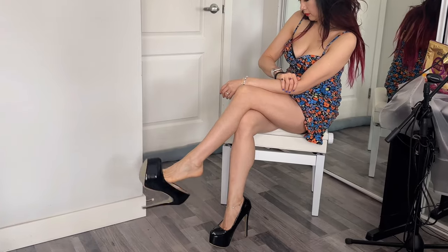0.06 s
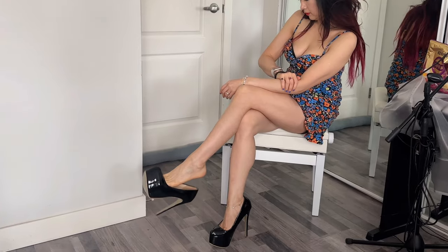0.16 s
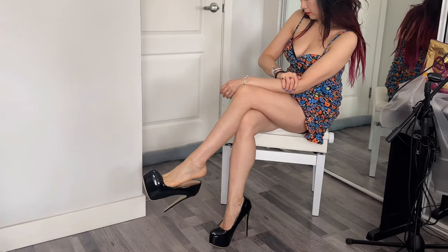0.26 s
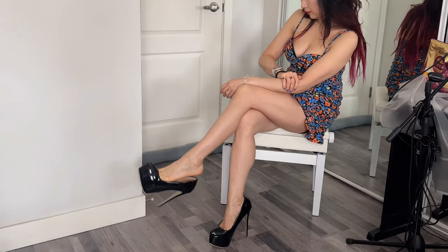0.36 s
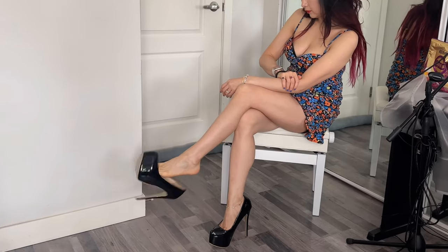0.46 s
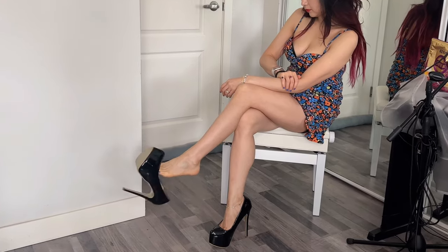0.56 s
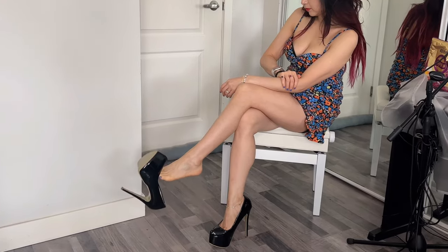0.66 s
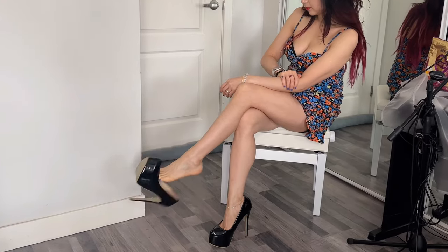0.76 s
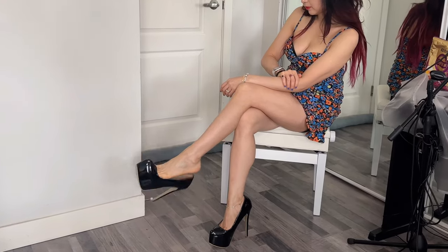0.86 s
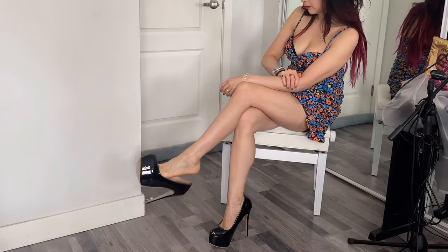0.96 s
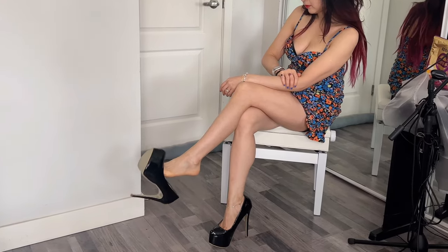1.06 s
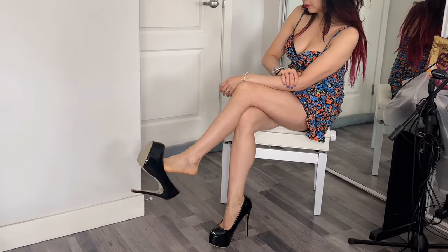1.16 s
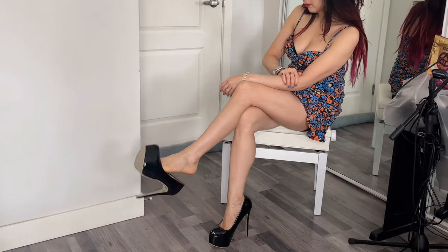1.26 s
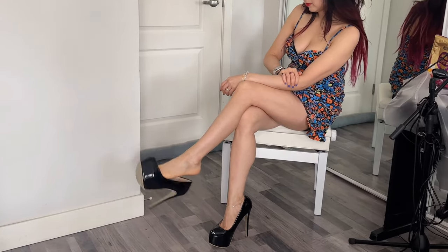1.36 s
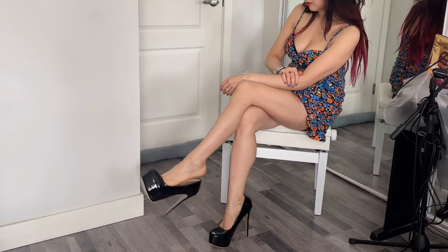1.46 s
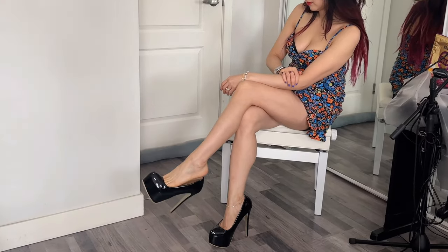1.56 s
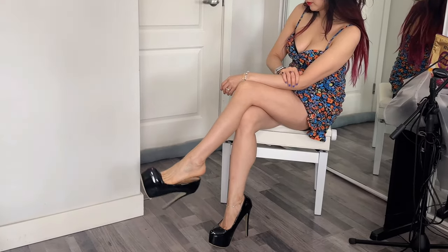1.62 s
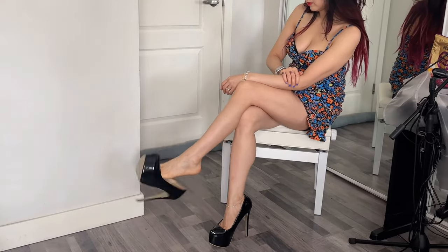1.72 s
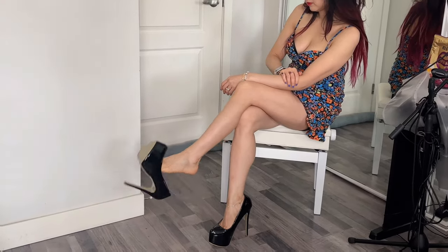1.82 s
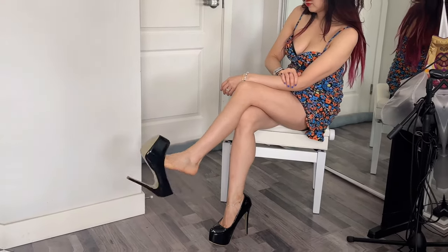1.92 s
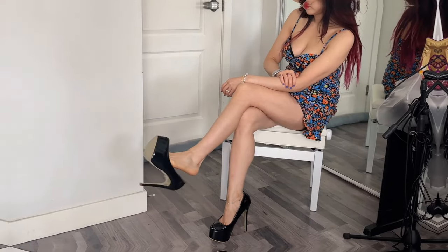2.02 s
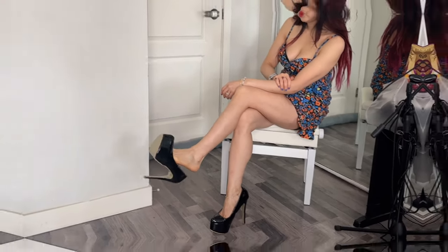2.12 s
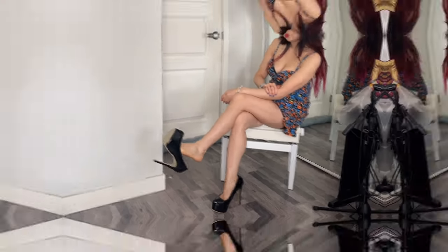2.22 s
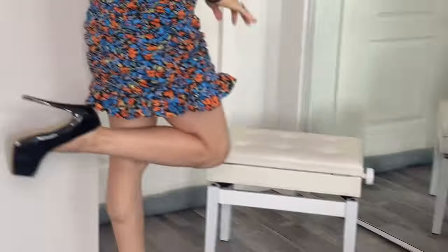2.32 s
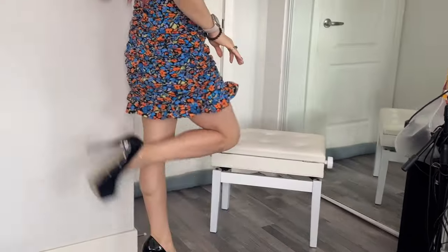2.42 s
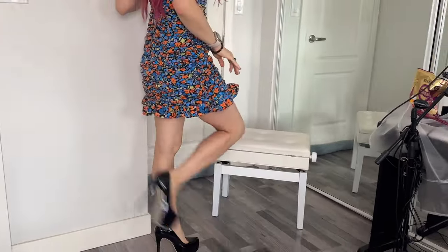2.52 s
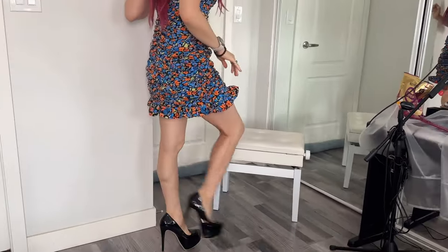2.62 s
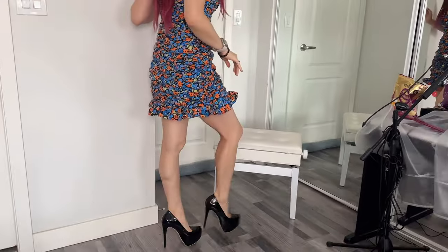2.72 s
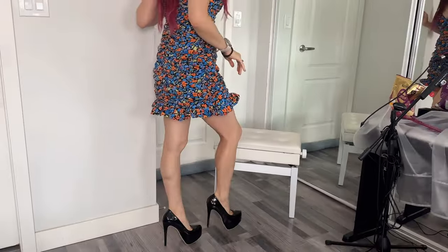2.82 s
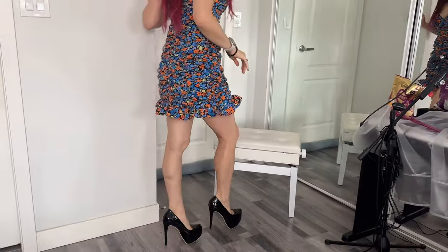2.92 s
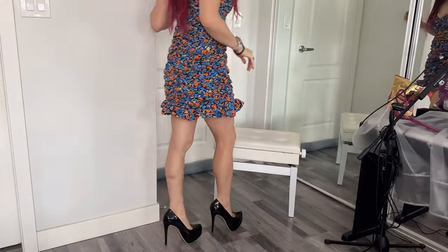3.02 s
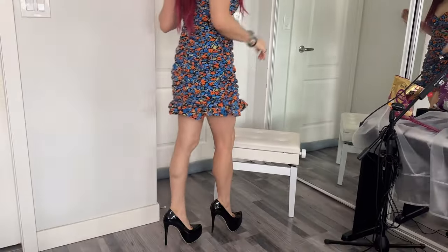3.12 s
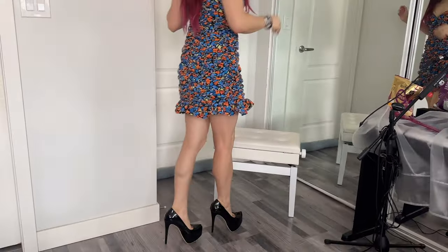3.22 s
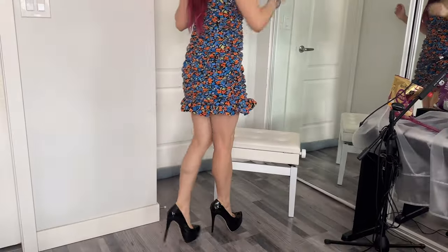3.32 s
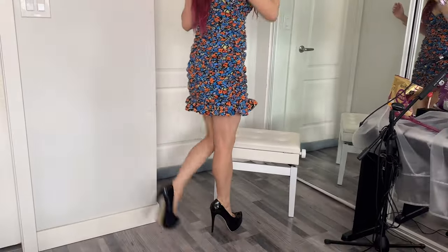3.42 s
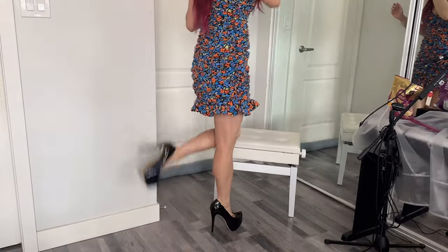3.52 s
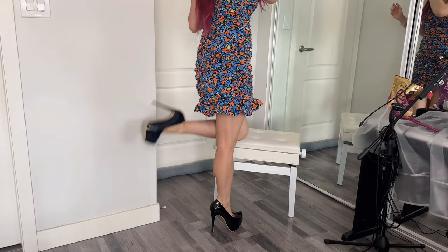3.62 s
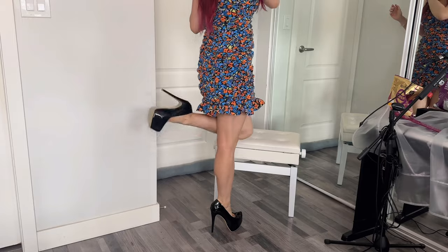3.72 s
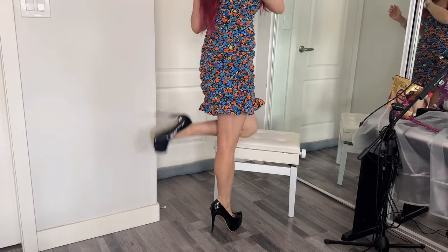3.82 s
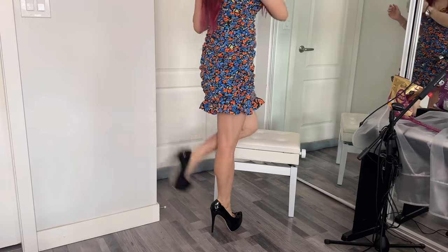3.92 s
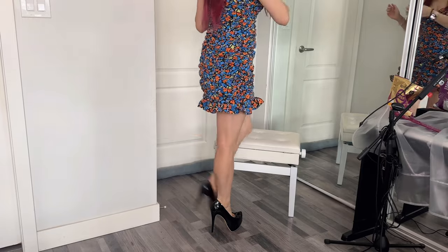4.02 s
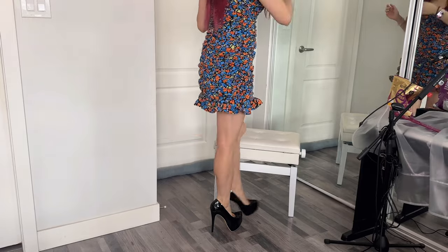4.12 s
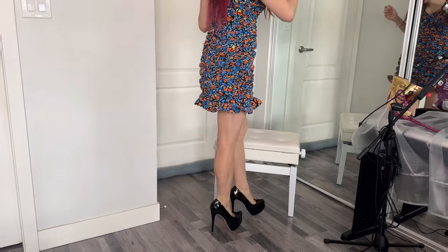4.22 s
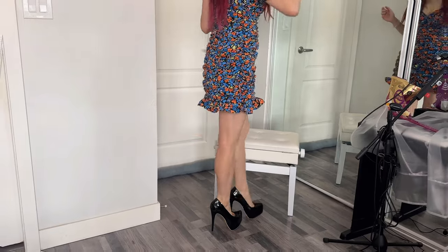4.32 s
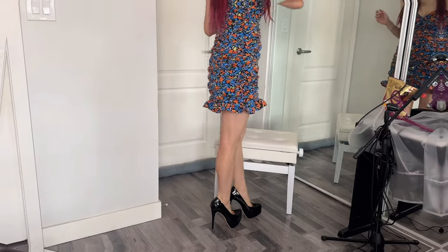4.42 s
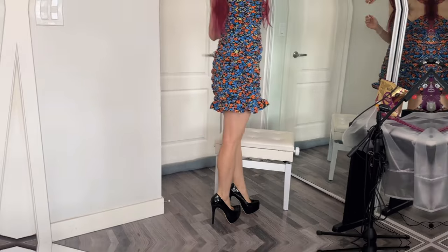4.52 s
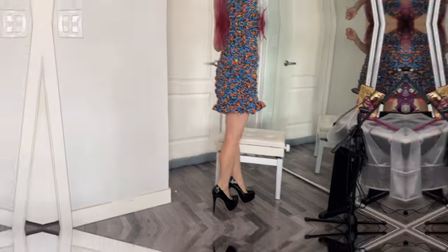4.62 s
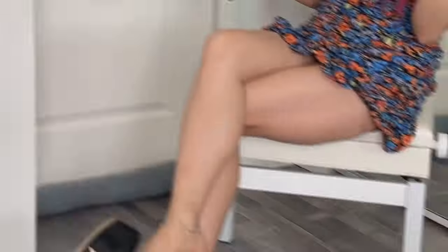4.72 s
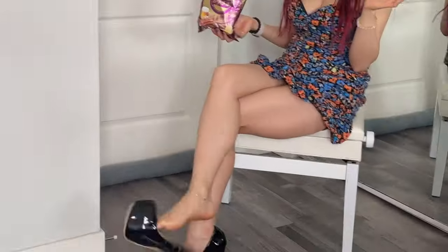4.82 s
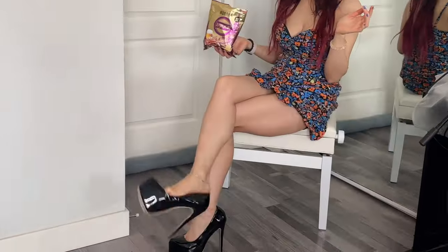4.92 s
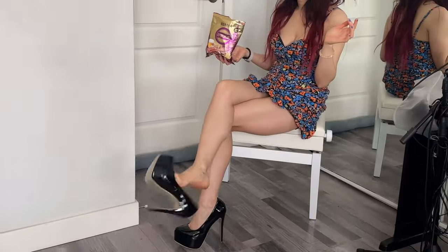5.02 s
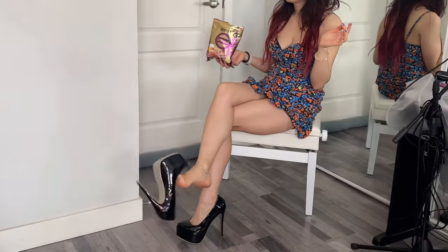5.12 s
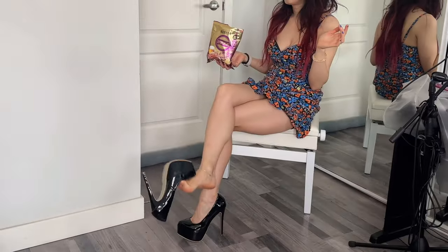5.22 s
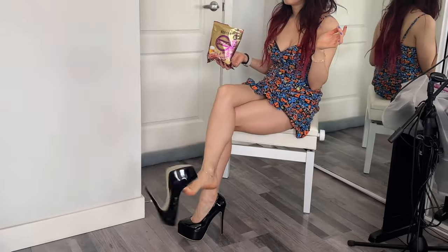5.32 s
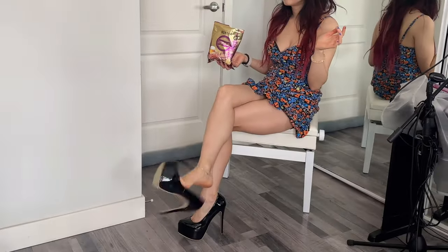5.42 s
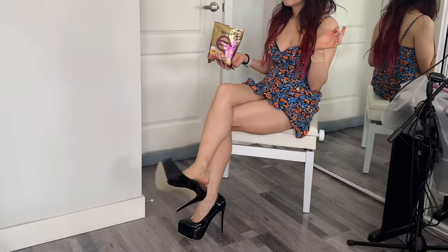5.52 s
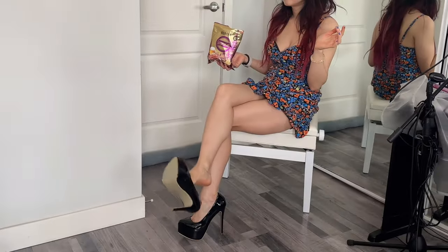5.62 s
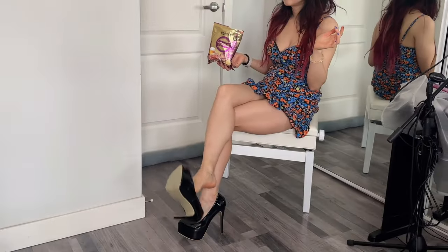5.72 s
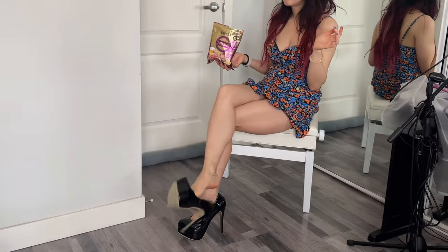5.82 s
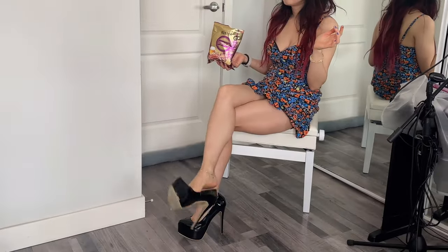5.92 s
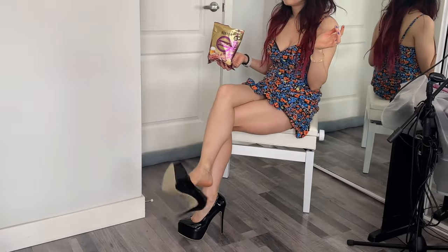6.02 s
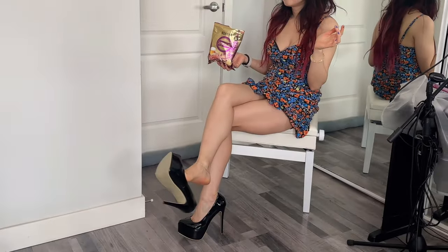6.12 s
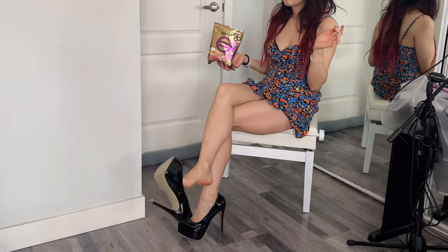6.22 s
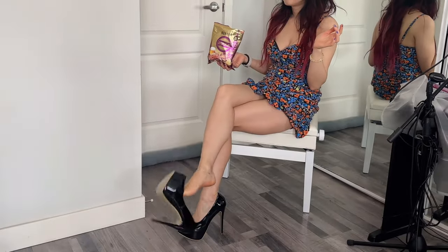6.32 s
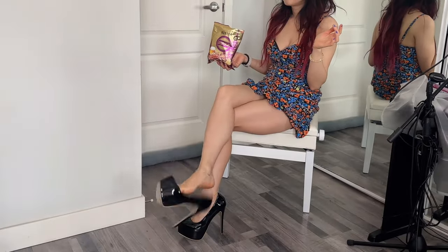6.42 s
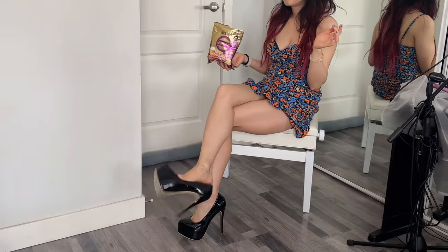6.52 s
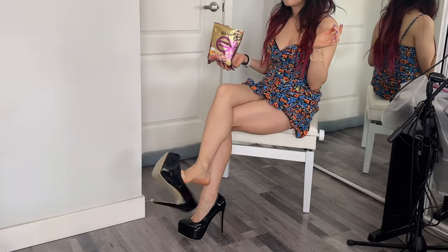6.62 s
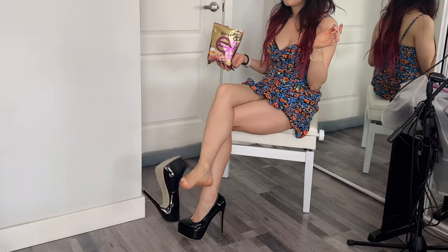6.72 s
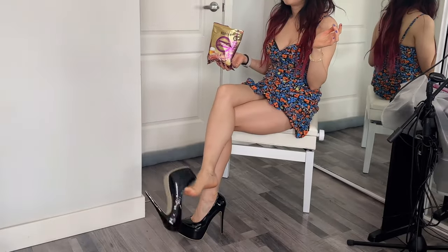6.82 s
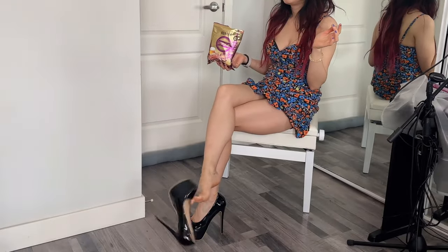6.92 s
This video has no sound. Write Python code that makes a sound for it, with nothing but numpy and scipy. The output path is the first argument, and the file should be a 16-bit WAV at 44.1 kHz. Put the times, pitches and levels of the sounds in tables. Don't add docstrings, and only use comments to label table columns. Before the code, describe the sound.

A small, bare, reflective room with laminate flooring, heard through a stereo microphone a short distance away. Low rumble, soft hiss and a faint wavering fan hum run throughout, with clothing rustle swelling as the body shifts. From 0.3 to 2.3 seconds a stiff high-heeled shoe dangles from the toes, making small hollow knocks, strongest near 0.85, clustered around 1.2, with airy skin slaps at 1.3, 1.55 and 2.1. At 2.65 a sharper slap and tap lead to a heavy double-edged stamp at 3.0, booming in floor and room. Lighter taps follow at 3.3 and 4.1, then a second strong stamp at 4.36 and small contacts. At 4.7 the scene cuts abruptly. A looser shoe swings wide, with duller knocks and soft sole slaps near 4.9, 5.5, 5.9, 6.3, 6.46 and 6.86, over renewed rustle.

```python
import sys
import numpy as np
from scipy import signal
from scipy.fft import rfft, irfft, next_fast_len
from scipy.io import wavfile

SR = 44100
rng = np.random.default_rng(int(sys.argv[2]) if len(sys.argv) > 2 else 0)


def transcribe(u):
    v = np.clip(np.atleast_2d(u).T, -1, 1)
    q = np.round(v * 32767).astype(np.int16)
    wavfile.write(sys.argv[1], SR, q)


def boost_factor(decibels):
    exponent = np.asarray(decibels, float) / 20
    return 10 ** exponent


N = 306936


def rms_one(x):
    return x / np.sqrt(np.mean(x ** 2, axis=-1, keepdims=True) + 1e-20)


def peak_one(x):
    return x / np.max(np.abs(x))


def at_hz(points, hz):
    table_hz, value = np.transpose(points)
    return np.interp(np.log(hz), np.log(table_hz), value)


def band(x, low_hz, high_hz):
    return signal.sosfilt(signal.butter(2, [low_hz, high_hz], "band", fs=SR, output="sos"), x + 1e-18)


def add(track, s, sound):
    i = round(s * SR)
    track[..., i:i + sound.shape[-1]] += sound[..., :N - i]


def within(rows, first_s, last_s):
    return [row for row in rows if first_s <= row[0] < last_s]


def ring(x, hz, t60):
    r, w = boost_factor(-60 / (t60 * SR)), 2 * np.pi * hz / SR
    return signal.lfilter([0, np.sin(w)], [1, -2 * r * np.cos(w), r * r], x + 1e-18)


def drift(rate_hz):
    points = int(N / SR * 40) + 2
    r = np.exp(-2 * np.pi * rate_hz / 40)
    slow = signal.lfilter([1], [1, -2 * r, r * r], rng.standard_normal(points + 200))[200:]
    return np.interp(np.arange(N) / SR * 40, np.arange(points), rms_one(slow))


def stereo_bands(size, alike_table, gain_at):
    out, edges = 0, 25 * 2 ** np.arange(0, 9.5, 1 / 3)
    white = rng.standard_normal((2, 2, size))
    for k, (low, high) in enumerate(zip(edges, edges[1:])):
        mid, side = band(white[k % 2], low, high)
        hz = np.sqrt(low * high)
        alike = np.clip(at_hz(alike_table, hz), -1, 1)
        out = out + gain_at(hz) * (np.sqrt(1 + alike) * mid + np.sqrt(1 - alike) * side * [[1], [-1]])
    return out


# start in seconds, rustle in dB, hold in seconds,
# share of it felt as rumble.
BODY_SHIFTS = [(.39, 2, .15, 3), (.87, 3, .2, .6), (2.07, 9, .15, -.5), (2.44, 2, .05, 1.5),
               (3.14, 18, .2, .75), (3.76, 3, .25, 1.1), (4.52, 17, .1, .9), (5.52, 5, .3, .4),
               (4.8, 9, .03, .1), (6.27, 8, .1, .2), (6.45, 12, .03, .25), (6.96, 12, .1, .25)]


def stirring():
    swell_s, settle_s = .13, .2
    t = np.arange(0, N, 64) / SR
    rumble, rustle = -3.5, 4
    for s, db, hold_s, rumble_share in BODY_SHIFTS:
        rise = 1 + (t - s) / swell_s
        fall = 1 - (t - s - hold_s) / settle_s
        shape = np.clip(np.minimum(rise, fall), 0, 1)
        rumble = rumble + rumble_share * db * shape
        rustle = rustle + db * shape
    return rumble, rustle


# pitch in Hz, level in dB per Hz.
ROOM_TONE = [(25, -23.5), (45, -6.5), (70, 1.5), (130, -12), (200, -11), (320, -21), (480, -25.5),
             (700, -29.5), (1200, -29.5), (1700, -34.5), (3200, -33.5), (4600, -40), (7800, -43),
             (10500, -40.5), (14000, -44)]
# pitch in Hz, left-right likeness (1 = the same).
ROOM_TONE_ALIKE = [(60, 0.97), (250, 0.74), (600, 0.26), (1500, 0.1), (4000, 0.2), (7500, 0.2), (9000, .8),
                   (11000, .95)]
# centre in Hz, width in Hz, level in dB.
HUMPS = [
    (120.7, 7.8, -74),
    (2250, 500, -83.5),
    (6430, 1400, -78.5),
    (10500, 1200, -90),
    (14200, 1800, -91.5),
]


def background():
    rumble, rustle = stirring()
    lumps = drift(4.6)[::64]

    def gain_at(hz):
        low = 1 / (1 + (hz / 280) ** 4)
        middle = (1 - low) / (1 + (hz / 3000) ** 4)
        db = at_hz(ROOM_TONE, hz) + .6 * drift(6)[::64]
        db = db + low * (rumble + 1.8 * lumps) + middle * rustle
        return boost_factor(db).repeat(64)[:N]

    air = boost_factor(-65.5) * 15 * stereo_bands(N, ROOM_TONE_ALIKE, gain_at)
    for hz, width_hz, db in HUMPS:
        mid, side = band(rng.standard_normal((2, N)), hz - width_hz / 2, hz + width_hz / 2)
        spread = .7 if hz < 9000 else .15
        hump = mid + spread * side * [[1], [-1]]
        air = air + boost_factor(db) * hump / np.sqrt(np.mean(hump ** 2))

    fan_hz, fan_db = 361.4, -73
    phase = 2 * np.pi * fan_hz * np.arange(N) / SR + 0.97 * drift(2.3)
    return air + boost_factor(fan_db + 1.4 * drift(2.4)) * np.sin(phase)


# start in seconds, peak in dB, shoe resonance in Hz, force in dB.
DANGLE_KNOCKS = [(0.272, -50.5, 708, -73), (0.437, -51, 710, -72), (0.813, -54, 1410, -69),
                 (0.852, -36.5, 921, -58), (0.865, -41.5, 810, -53), (1.174, -48.5, 710, -62.5),
                 (1.201, -42.5, 756, -70), (1.215, -47, 670, -71), (1.234, -45, 694, -68),
                 (1.282, -44.5, 660, -60), (1.557, -48.5, 1290, -45), (1.818, -57, 786, -78),
                 (1.87, -64, 476, -72), (2.023, -51.5, 1290, -72), (2.056, -46, 700, -61),
                 (2.33, -58, 910, -64)]
TREAD_KNOCKS = [(2.658, -35.5, 1080, -48), (2.679, -43, 1390, -53), (2.99, -52, 700, -75),
                (2.998, -48, 680, -72), (3.007, -15, 556, -29), (3.274, -41, 860, -53),
                (3.295, -37, 606, -54), (3.315, -44.5, 869, -53), (3.449, -60, 466, -63),
                (3.595, -55.5, 864, -65), (3.73, -62.5, 690, -64), (3.969, -56.5, 680, -68),
                (4.079, -40, 875, -57), (4.354, -27.5, 470, -39), (4.363, -18.5, 647, -36.5),
                (4.526, -43, 500, -67), (4.562, -41, 485, -54), (4.667, -61, 452, -55)]
SWING_KNOCKS = [(4.739, -55, 800, -70), (4.779, -57, 1140, -75), (4.854, -47, 1650, -56),
                (4.882, -44, 740, -54), (4.898, -38, 1027, -54), (5.446, -51.5, 730, -70),
                (5.482, -40, 970, -58), (5.836, -43, 1130, -70), (5.89, -35.5, 940, -52),
                (6.147, -55.5, 1010, -72), (6.265, -55.5, 778, -69), (6.297, -49.5, 766, -69),
                (6.339, -52, 735, -70), (6.425, -52, 743, -60), (6.462, -36, 620, -52),
                (6.483, -59, 580, -63), (6.825, -57, 890, -71), (6.858, -50.5, 495, -48.5)]
# thud over crack in dB, upper resonances in dB.
SHOE_WEIGHTS = [
    (-9, -3),
    (13, -1.5),
    (0, -6.5),
]


def knocks(first_s, last_s):
    rows = [(*row, *weight) for table, weight in zip([DANGLE_KNOCKS, TREAD_KNOCKS, SWING_KNOCKS], SHOE_WEIGHTS)
            for row in within(table, first_s, last_s)]
    out, t = np.zeros(N), np.arange(round(.05 * SR)) / SR
    chance = rng.standard_normal((len(rows), 3 + len(t)))

    sweep_hz, sweep_s = 8500, .003
    sweep = 2 * np.pi * sweep_hz * sweep_s * (1 - np.exp(-t / sweep_s))
    cracks = np.sin(sweep + chance[:, :1]) + .45 * chance[:, 3:]
    cracks = cracks * t / .0015 * np.exp(-t / 0.0021)
    cracks = rms_one(band(cracks, 1300, 6000)) / 4

    contacts = t ** 2 * np.exp(-2 * np.pi * 2.5 * np.array(rows)[:, 2:3] * t)
    thuds = band(band(contacts, 88, 400), 84, 292)

    for row, luck, contact, crack, thud in zip(rows, chance, contacts, cracks, thuds):
        s, peak_db, hz, force_db, thud_over_db, upper_db = row
        modes = hz * np.array([1, 1.55, 2.4]) * (1 + .05 * luck[:3] * [0, 1, 1])
        mode_db = [0, upper_db, upper_db - 5]
        hollow = sum(boost_factor(db) * ring(contact, f, 11.4 / f) for f, db in zip(modes, mode_db))
        sound = boost_factor(peak_db + 1) * peak_one(band(hollow, 0.52 * hz, 6000))
        sound += boost_factor(force_db - 5) * crack
        sound += boost_factor(force_db + thud_over_db - 1.5) * peak_one(thud)
        add(out, s + .0007, sound)
    return out


# start in seconds, peak in dB, standing place (0 or 1), contact corner in Hz.
FLOOR_LANDINGS = [(2.668, -43, 0, 297), (2.695, -42, 1, 250), (3.008, -16, 0, 915), (3.014, -49, 0, 500),
                  (3.029, -16, 0, 880), (3.04, -19.5, 0, 350), (3.3, -40, 0, 500), (3.33, -47, 1, 400),
                  (.52, -58, 1, 200), (2.45, -62, 1, 250), (6.17, -56, 1, 200), (1.285, -54, 1, 250),
                  (2.33, -61, 1, 250), (5.57, -55, 1, 250), (6.465, -52, 1, 200), (3.63, -57.5, 1, 249),
                  (3.75, -58.5, 1, 255), (4.1, -47.5, 1, 400), (4.364, -32, 1, 700), (4.372, -20, 1, 492),
                  (4.386, -36, 1, 500), (4.398, -18.5, 1, 410), (4.53, -45, 1, 600), (4.66, -42, 0, 600),
                  (4.68, -42, 1, 300), (4.692, -37.5, 1, 298), (4.701, -34.5, 1, 295),
                  (4.92, -45.5, 1, 296)]
# pitch in Hz, level in dB, t60 in seconds.
BOOM_MODES = [
    [(85.5, -6.5, 0.2), (147.6, 3.5, 0.09), (204, -4.5, 0.18), (243.5, 2, 0.24), (257, -0.5, 0.22),
     (339, -13.5, 0.17), (415, -9.5, .3), (495, -10.5, 0.35), (567, -17, 0.5), (677, 3.5, .17),
     (732, -11.5, .25), (812, -20, 0.27), (914, -19, .4)],
    [(71.8, -5.5, 0.27), (94.3, -8.5, .3), (138, 4, 0.18), (237, -2.5, .25), (275.1, 2, 0.21),
     (347, -16.5, 0.26), (428, -20, .45), (598, -12, .34), (743, -21.5, 0.25), (970, -33.5, 0.55)],
]


def landings(first_s, last_s):
    pushes, t = np.zeros((2, N)), np.arange(round(.03 * SR)) / SR
    for s, peak_db, place, contact_hz in within(FLOOR_LANDINGS, first_s, last_s):
        push = t * np.exp(-2 * np.pi * contact_hz * t)
        add(pushes[round(place)], s, boost_factor(peak_db) * push / push.sum())
    boom = np.zeros(N)
    for push, modes in zip(pushes, BOOM_MODES):
        for k, (hz, db, t60) in enumerate(modes):
            boom += boost_factor(db - 7.5) * (-1) ** k * ring(push, hz, min(t60, .6))
    return boom, band(band(pushes.sum(0), 70, 1500), 55, 2500)


# start in seconds, hiss in dB, body in dB, air in dB.
SKIN_SLAPS = [(0.8584, -71, -44.5, -76), (1.271, -43.5, -50.5, -58), (1.5503, -51, -50.5, -63),
              (2.0594, -72, -55.5, -75), (2.119, -53.5, -64, -75), (2.6543, -39.5, -37.5, -50.5),
              (3.001, -36, -33.5, -53), (3.2944, -53, -44, -61), (3.387, -52.5, -59.5, -66),
              (3.88, -57.5, -73.5, -73), (4.077, -67, -51.5, -68), (4.354, -49, -39, -60),
              (4.6486, -60.5, -61, -70), (4.7694, -75, -66.5, -82), (4.9, -67, -51.5, -66),
              (5.5595, -51.5, -55, -65.5), (5.88, -68, -46.5, -68), (6.248, -82, -68, -83),
              (6.46, -59.5, -51.5, -64), (6.863, -49, -48, -72.5)]


def slaps(first_s, last_s):
    rows = within(SKIN_SLAPS, first_s, last_s)
    out, t = np.zeros(N), np.arange(round(.15 * SR)) / SR
    chance = rng.standard_normal((len(rows), 2, len(t)))
    lumps = boost_factor(3.4 * chance[:, 1, ::60]).repeat(60, axis=1)[:, :len(t)]
    grain = chance[:, 0] * lumps

    hisses = rms_one(band(grain, 2800, 6650))
    bodies = rms_one(ring(grain, 1147, 0.0038) - 0.47 * ring(grain, 2070, 0.0018))
    airs = boost_factor(1.5) * rms_one(band(grain, 7200, 11000)) + boost_factor(3.5) * rms_one(band(grain, 12500, 20000))
    for (s, hiss_db, body_db, air_db), hiss, body, air in zip(rows, hisses, bodies, airs):
        fade = t / (.019 - .0003 * (body_db + 50))
        sound = boost_factor(hiss_db - 10.5) * hiss + boost_factor(body_db - 2.5) * body + boost_factor(air_db) * air
        add(out, s + .005, sound * np.exp(-fade) * (1 - np.exp(-fade / 0.12)))
    return out


# pitch in Hz, t60 in seconds.
REVERB_T60 = [(60, 0.53), (250, 0.51), (700, 0.55), (2000, 0.46), (6000, 0.72), (14000, 0.11)]
# pitch in Hz, left-right likeness (1 = the same).
REVERB_ALIKE = [(60, 1), (250, .8), (500, .1), (1000, 0.3), (4000, 0.25), (8500, 0.7), (11000, .95),
                (14000, 0.9)]


def room(wet_db, build_s):
    t = np.arange(round(.7 * SR)) / SR
    far_wall_s, far_wall_db = 0.0209, 2.5
    build = 1 - np.exp(-(t / build_s) ** 2)
    early = 1 + 0.75 * np.exp(-(t / 0.048) ** 2)
    shape = build * early + boost_factor(far_wall_db) * np.exp(-((t - far_wall_s) / 0.0012) ** 2)
    tail = shape * stereo_bands(len(t), REVERB_ALIKE, lambda hz: boost_factor(-60 * t / at_hz(REVERB_T60, hz)))
    return boost_factor(wet_db) * tail / np.sqrt(np.sum(tail ** 2) / 2)


def shoes(first_s, last_s, near, floor):
    knock, slap = knocks(first_s, last_s), slaps(first_s, last_s)
    boom, push = landings(first_s, last_s)
    shoe_wet = signal.fftconvolve((knock + boost_factor(1) * slap)[None], near, axes=1)[:, :N]
    floor_wet = signal.fftconvolve(push[None], floor, axes=1)[:, :N]
    direct = boost_factor(-2.5) * knock + boost_factor(1) * slap + boom * boost_factor([[.4], [-.4]])
    return (direct + shoe_wet + floor_wet) * np.clip((last_s - np.arange(N) / SR) / .0015, 0, 1)


def scene():
    change_s = 4.7125
    near, floor = room(wet_db=0.85, build_s=0.0082), room(wet_db=32, build_s=0.019)
    return shoes(0, change_s, near, floor) + shoes(change_s, 8, near, floor) + background()


def roll_off(x):
    return signal.sosfilt(signal.butter(12, 15800, fs=SR, output="sos"), x)


# pitch in Hz,
# lead of the left in radians, left over right in dB.
MIC_PORTS = [(20, 0, -.5), (700, .25, -.5), (2700, .8, .5), (6300, 1.3, 5), (8600, 0, .5), (10400, -2.8, 0),
             (12200, -3.6, 0), (13700, -6.1, 0)]


def record(dry):
    size = next_fast_len(N + 4096)
    hz = np.arange(size // 2 + 1) * SR / size
    port_hz, lead, tilt_db = np.transpose(MIC_PORTS)
    half = boost_factor(np.interp(hz, port_hz, tilt_db) / 2) * np.exp(.5j * np.interp(hz, port_hz, lead))
    x = irfft(rfft(dry, size) * [half, 1 / half], size)[:, :N]
    x = signal.sosfilt(signal.butter(2, 55, "high", fs=SR, output="sos"), x)
    x = signal.sosfilt(signal.cheby2(12, 70, 16500, fs=SR, output="sos"), x)
    return roll_off(x)


dry = scene()
out = record(dry)
transcribe(out)
```